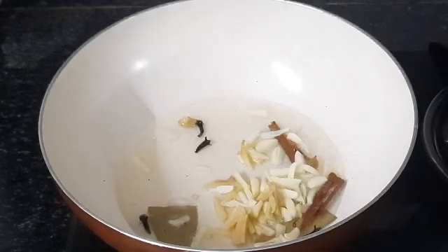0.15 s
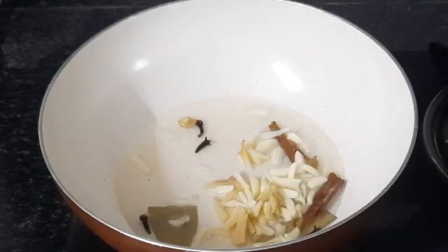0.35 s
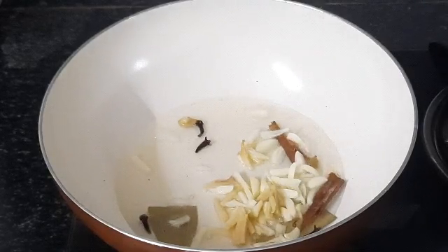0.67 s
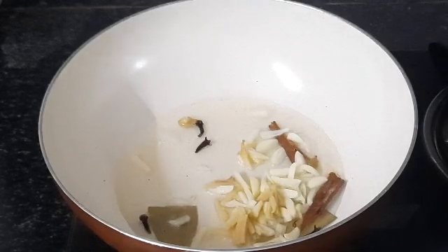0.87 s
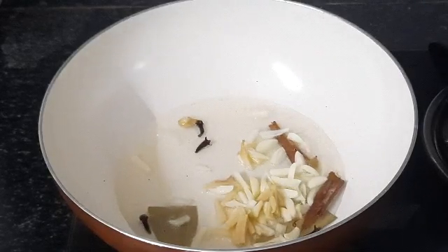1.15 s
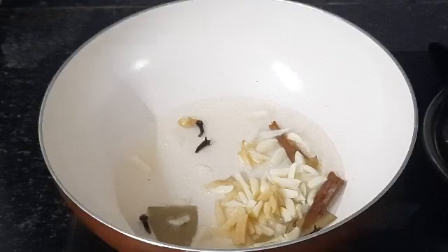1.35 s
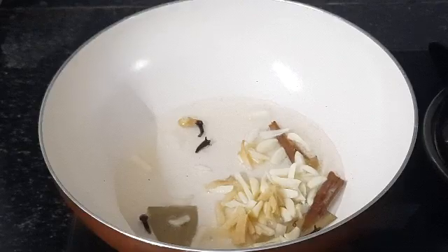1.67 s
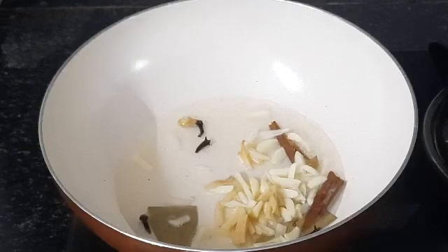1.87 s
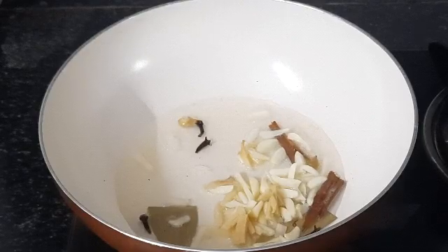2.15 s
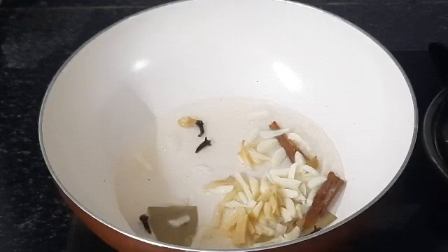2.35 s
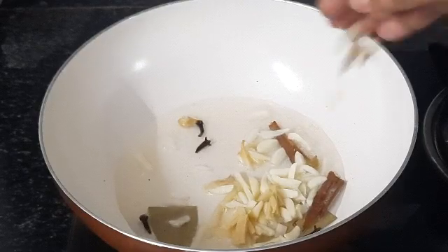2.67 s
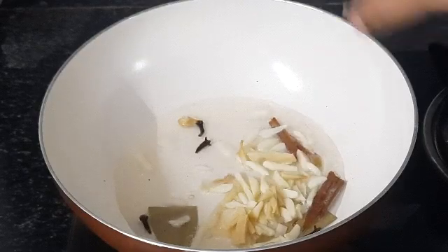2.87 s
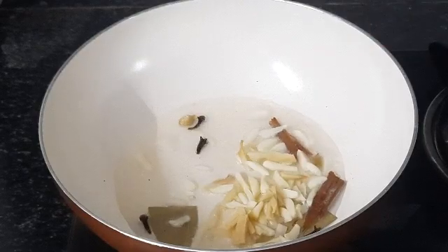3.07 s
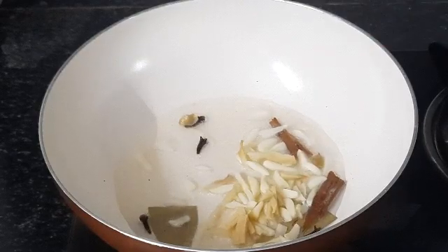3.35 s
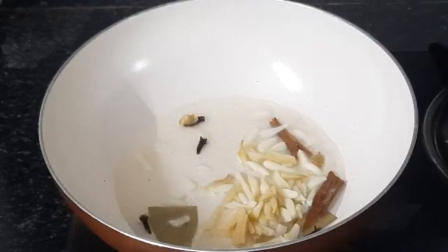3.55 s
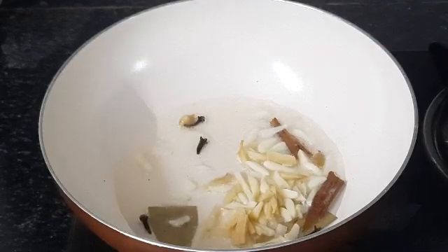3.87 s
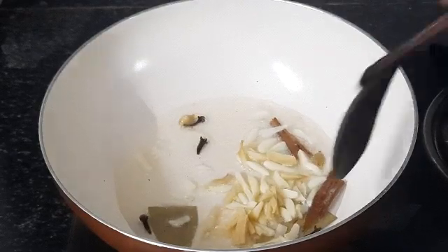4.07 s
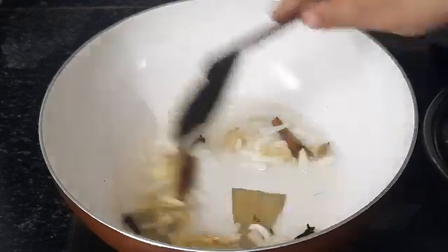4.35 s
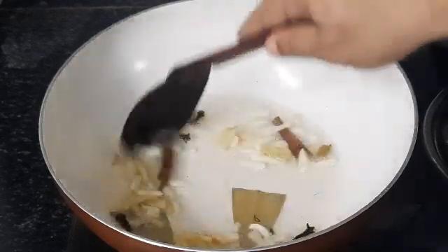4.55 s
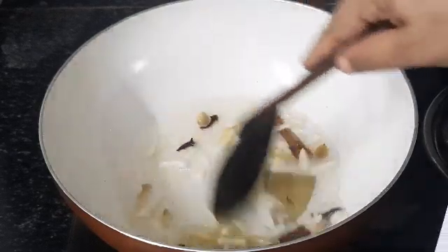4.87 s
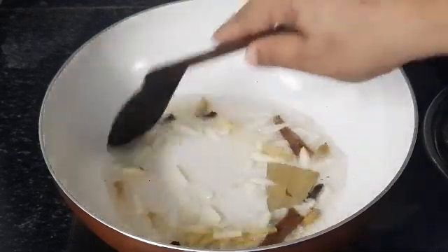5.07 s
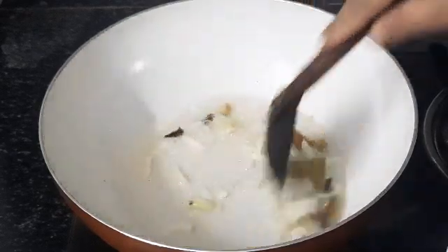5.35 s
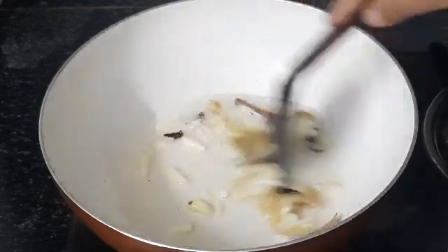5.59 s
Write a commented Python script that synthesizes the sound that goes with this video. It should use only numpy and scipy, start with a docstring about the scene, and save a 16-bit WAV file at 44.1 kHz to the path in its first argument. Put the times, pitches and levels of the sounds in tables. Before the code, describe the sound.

Steady bright sizzle of hot oil with sharp pops, scattered kitchen utensil knocks, then a spatula tapping and scraping the pan as the sizzle swells.

```python
"""Ginger, garlic and whole spices sizzle in hot oil in a wide pan, in a small kitchen, heard by two spaced microphones.
All along, tiny steam bubbles fizz as short tones in noise, larger ones pop, and filtered noise makes the room's hush.
First a spoon is knocked and rubs; at about 1 s everything dips very briefly. Then a dish, a small bowl and
the dish again are knocked on the counter, and last a spatula taps and scrapes the pan while the fizz grows.
Knocks are short pulses that ring a list of tones, rubbing is shaped noise, and dull bumps are fading low tones."""
import sys
import numpy as np
from scipy import signal
from scipy.fft import rfft, irfft
from scipy.io import wavfile
from scipy.ndimage import uniform_filter1d

SR = 44100
rng = np.random.default_rng(int(sys.argv[2]) if len(sys.argv) > 2 else 0)


def bounce(signal):
    """Save signal as a 16-bit WAV file at the path given by the first command-line argument."""
    frames = np.transpose(np.atleast_2d(signal))
    limited = np.clip(frames, -1, 1)
    pcm = np.round(limited * 32767).astype(np.int16)
    wavfile.write(sys.argv[1], SR, pcm)


def amplitude_ratio(level_db):
    """Convert a level in decibels to the matching linear amplitude (field) ratio."""
    exponent = np.asarray(level_db, float) / 20
    return 10 ** exponent


N = 252252  # length in samples

# the tones the pan can ring with: f/Hz, level struck in the middle/dB, time to fade by 60 dB if left free/s,
# gain when struck at the side/dB, gain when struck at the rim/dB
PAN_TONES = [(331, 22.5, 0.21, -6, -5), (370, 19, 0.098, 3.5, -1), (505, 12, 0.14, -9, 6),
             (716, 4.5, 0.56, -23, 3.5), (766, -14.5, 0.72, 21, 15), (768, -12, 0.33, 14, 20.5),
             (863, -13, 0.66, 8, -9), (1277, 6.5, 0.067, -18, -5), (1408, -17.5, 0.24, 26.5, 3),
             (1840, -6, 0.034, -25, 18), (1996, 10.5, 0.084, -23, -8), (1887, -6.5, 0.31, -2, -12),
             (2215, -18.5, 0.15, 26.5, -6), (2400, 2, 0.13, 2, -1), (2580, -17, 0.68, -10, 17.5),
             (2710, -22, 0.33, -2, 22), (2880, 0, 0.12, -1, -4.5), (5830, 12, 0.18, -5, -7),
             (6720, 17, 0.11, -4, -5.5)]


def evened(x):
    """Scales to rms 1."""
    return x / np.sqrt(np.mean(x ** 2) + 1e-20)


def read(points, hz):
    """Reads a table on a log frequency axis."""
    f, value = np.transpose(points)
    return np.interp(np.log(hz + 1), np.log(f + 1), value)


def coloured(x, points):
    """Filters by a dB spectrum."""
    gain = amplitude_ratio(read(points, np.fft.rfftfreq(x.shape[-1], 1 / SR)))
    return irfft(rfft(x) * gain, x.shape[-1])


def pulse(colour, size):
    """A single hard impulse of the given colour, peak 1."""
    click = 1. * (np.arange(size) == 50)
    x = coloured(click, colour) * signal.windows.tukey(size, .002)
    return x / abs(x).max()


def add(mix, s, sound, pan_db, lag):
    """Places a sound (one row, or one for each side); it reaches the left microphone lag samples after the right."""
    for ear, sign in enumerate((1, -1)):
        row = np.atleast_2d(sound)[-ear]
        start = max(round(s * SR + sign * lag / 2), 0)
        part = mix[ear, start:][:len(row)]
        part += amplitude_ratio(sign * pan_db / 2) * row[:len(part)]


def fizz():
    """Thousands of tiny bubbles burst, each a few cycles at its own pitch and place, over a blur of finer ones."""
    # how hard the oil boils: t/s, level/dB
    boil = [(0.0, -50.5), (1.31, -50.5), (1.7, -54), (3.43, -49), (4.14, -53), (4.51, -42), (5.72, -42)]
    # how bright the fizz is: f/Hz, level/dB
    fizz_colour = [(290, -19), (500, -20), (761, -12), (1060, -21.5), (1300, -8), (1550, -16.5), (2810, -7),
                   (9920, -7), (12700, -3.5), (14900, -9), (16000, -49)]
    bubbles_per_s, bubble_spread_db, pitches = 2900, 8.5, 24
    size_db = bubble_spread_db * np.minimum(rng.exponential(1, N), 5)
    size = amplitude_ratio(size_db) * (rng.random(N) < bubbles_per_s / SR)
    kind, t = rng.integers(0, pitches, N), np.arange(300) / SR
    bubbles = np.zeros((2, N))
    for k, hz in enumerate(np.geomspace(1500, 15000, pitches)):
        burst = np.sin(2 * np.pi * hz * t) * np.exp(-t * hz / 3.6) * np.sqrt(hz / SR) * hz / SR
        heard = signal.oaconvolve(size * (kind == k), burst)[:N]
        bubbles += [heard, np.roll(heard, rng.integers(-12, 13))]  # each pitch has its own place
    blur = amplitude_ratio(11.0) * rng.standard_normal((2, N))
    out = evened(coloured(evened(bubbles) + blur, fizz_colour))
    out = out * amplitude_ratio(np.interp(np.arange(N) / SR, *np.transpose(boil)))
    return amplitude_ratio(np.array([[1.2], [-1.2]])) * out  # a little stronger left


def pops():
    """A pocket of steam bursts: a sharp click around its pitch, a short tone, a low thump and a spray of droplets."""
    # loud steam pops: t/s, level/dB, bubble pitch f/Hz, low thump relative to the pop before a fixed boost/dB
    loud_pops = [(0.7536, -30.5, 12300, -11), (0.979, -18.5, 12300, -4.5), (1.0078, -34, 2830, 2.5),
                 (1.1214, -39, 2920, -20), (1.1898, -19.5, 11000, -6.5), (1.31, -22.5, 11500, -17),
                 (1.5507, -43, 3900, -5), (1.5734, -41, 2590, -29), (2.0138, -27.5, 11300, -9),
                 (2.2436, -41, 3250, 8), (2.4043, -23.5, 13000, -50), (2.5474, -37, 3800, -33),
                 (2.6544, -35, 2780, -38), (2.707, -34, 11200, -7), (2.7668, -26, 12500, -2.5),
                 (2.806, -35, 4300, -1), (2.9497, -32, 7160, -2.5), (3.168, -39, 4800, -15),
                 (3.245, -28, 12100, -28), (3.3501, -21, 12700, -12), (3.8993, -38, 7260, 3),
                 (3.9858, -35, 7000, -7.5), (4.1299, -29.5, 13500, 1), (4.181, -35.5, 5500, -35),
                 (4.3405, -34, 4150, 11.5), (4.5096, -29.5, 3070, -1), (4.5706, -28, 8600, -33),
                 (4.6017, -26, 5330, -14), (5.028, -43, 3500, 7), (5.1008, -28, 10600, -8),
                 (5.4906, -32, 4800, -28), (5.6412, -33, 5640, 5)]
    thump_colour = [(300, -22.5), (700, -6.0), (1500, -5.5), (3000, -6.0), (6000, -14.0)]  # f/Hz, level/dB
    out, t = np.zeros((2, N)), np.arange(4096) / SR
    # ten fainter pops come at random times, levels and pitches
    faint = [(a * N / SR, -47 + 10.0 * b, 2600 * 2 ** (2 * c), -20) for a, b, c in rng.random((10, 3))]
    for s, db, hz, low_db in list(loud_pops) + faint:
        spray_db = 0.5 - 2.5 * np.log2(hz / 3000)  # smaller, higher pockets throw fewer droplets
        grit, place = rng.standard_normal((2, len(t))), rng.uniform(-0.99, 1)
        colour = [(hz / 16, -40), (hz / 4, -12.0), (hz, 0), (hz * 3, -12.0)]
        click = 1.1 * pulse(colour, len(t))
        spray = amplitude_ratio(spray_db) * evened(coloured(grit, colour)) * np.exp(-t / 0.00088)
        tone = 0.36 * np.sin(2 * np.pi * hz * t) * np.exp(-t * hz / 9.2)
        thump = amplitude_ratio(low_db + 10.5) * pulse(thump_colour, len(t))
        pop = click + spray + np.roll(tone, shift=48) + thump
        add(out, s, amplitude_ratio(db) * pop, 3.8 + 0.47 * place, -6 * place)
    return out


def knocks(rows, modes, feel, pan_db, lag, ring_db, crack_db, rattle_db, split, grip_s):
    """Each blow is a hard pulse with a rattle (the contact); it rings the object's tones until a grip stills them.

    feel: bass dB at depth 0, bass dB per dB of depth, treble dB at hardness 0, treble dB per dB of hardness."""
    wobble_db = 3.5  # loose contacts make every ring waver
    contact, ringing, t = np.zeros((2, N)), np.zeros((2, N)), np.arange(48 * 256) / SR
    hz, mode_db, t60, *gains_db = (c[:, None] for c in np.transpose(modes))
    for s, db, mid, high, *spot in rows:
        # spot struck: 0 middle, 1 side, 2 rim; none for the spoon and the bowl
        spot_db = sum(gain * max(1 - abs(spot[0] - k - 1), 0) for k, gain in enumerate(gains_db))
        low, top = feel[0] + feel[1] * mid, feel[2] + feel[3] * high
        colour = [(150, low - 35), (310, low), (750, mid), (1600, 0), (2750, high), (4800, top), (12000, top - 12.0)]
        # each higher tone is split and beats
        beat, start = rng.standard_normal((2, len(hz), 1))
        twins = 1 + split * (hz > 600) * np.cos(2 * np.pi * (35 + 19.0 * beat) * t + .5 * start)
        waver = np.repeat(rng.standard_normal((len(hz), 24)), 512, axis=1)
        twins = twins * amplitude_ratio(wobble_db * uniform_filter1d(waver, size=512))
        # each higher tone radiates its own way to each microphone
        turn = 0.81 * (hz > 740) * rng.standard_normal((2, len(hz), 1))
        rise = np.square(1 - np.exp(-t * hz / 1.61))
        grip = np.square(t / (grip_s * (1 + 1.1 * sum(spot))))  # the grip stills the edges last
        fall = amplitude_ratio(-60 * t / t60 - grip)
        strength = amplitude_ratio(mode_db + spot_db + read(colour, hz))
        ring = strength * rise * twins * np.sin(2 * np.pi * hz * t + turn)
        # the touch damps the first swing fast
        swing = amplitude_ratio(ring_db) * 1.93 * np.exp(-t / 0.0029) * ring.sum(1)
        grit = coloured(rng.standard_normal((2, len(t))), colour)
        rattle_fall = np.exp(-t / 0.0056) + 0.61 * np.exp(-t / 0.0033)
        rattle = amplitude_ratio(rattle_db) * (grit + 0.75 * grit[0]) * rattle_fall
        crack = amplitude_ratio(crack_db) * pulse(colour, len(t))
        add(contact, s, amplitude_ratio(db) * (crack + rattle + swing), pan_db, lag)
        add(ringing, s, amplitude_ratio(db + ring_db) * (fall * ring).sum(1), pan_db, lag)
    # the knocks carry little below 230 Hz
    return signal.sosfilt(signal.butter(4, 230, "high", fs=SR, output="sos"), [contact, ringing])


def pan():
    """The spatula taps the pan; oil and spices still its ringing."""
    # taps: t/s, level/dB, depth (how far the blow reaches the low tones)/dB, hardness (the high ones)/dB, spot struck
    pan_taps = [(4.2746, -23.5, -5, -3.5, 0.15), (4.6253, -27, 1, -3.5, 1.1), (4.676, -39, 1, -3, 0.97),
                (4.8738, -39.5, -12, -2.5, 1.4), (5.1716, -51, 13, -1, 0.034),
                (5.5625, -20, -19.5, -2.5, 1.97), (5.5725, -49, -12, -4, 1.97)]
    return knocks(pan_taps, PAN_TONES, (-20.5, 0.53, 12, 9), pan_db=2.3, lag=-3.5, ring_db=-12.5,
                  crack_db=-4.0, rattle_db=3.7, split=0.76, grip_s=0.06)


def dish():
    """Blows on a dish ring its tones, which are soon stilled."""
    # blows: t/s, level/dB, depth/dB, hardness/dB, spot struck (0 middle, 1 side)
    dish_blows = [(1.2217, -27.5, 0.5, -25.5, 0.12), (1.2544, -39, 0, -42, 0.088),
                  (3.4558, -42, -3, -19.5, 0.2), (3.4645, -35.5, 6, -18, 0.13),
                  (3.505, -23, -0.5, -21, 0.14), (3.562, -51.5, 14, -14, 0.62),
                  (3.6541, -31.5, 1.5, -6.5, 1)]
    # tones: f/Hz, level struck in the middle/dB, free 60 dB fade/s, gain when struck at the side/dB
    dish_tones = [(303.5, 7, 0.27, -8), (428, 5, 0.083, 5), (699, -10, 0.053, 21), (774, 0.5, 0.18, -10),
                  (967, 4, 0.082, -20), (1211, -1.5, 0.2, 11), (1590, -1.5, 0.14, -12),
                  (1610, -8.5, 0.17, 13.5), (1776, -5, 0.037, 13), (1870, 10, 0.12, -8),
                  (2230, 5.5, 0.41, 1.5), (2250, 16, 0.17, -5.5), (2460, 13, 0.067, -7.5),
                  (2910, 20, 0.04, -7.5), (3225, 11.5, 0.06, -3), (3500, 7.5, 0.056, -2.5),
                  (4140, 0.5, 0.2, 0.5)]
    return knocks(dish_blows, dish_tones, (1.2, 2, -0.21, 0.63), pan_db=0.49, lag=9.4, ring_db=-7.5,
                  crack_db=-2.0, rattle_db=1.5, split=0.8, grip_s=0.013)


def spoon():
    """Blows on a spoon ring its tones, most of them very short."""
    # blows: t/s, level/dB, depth/dB, hardness/dB
    spoon_blows = [(0.0074, -32, -25, -11.5), (0.072, -43.5, -20, -23), (0.18, -37.5, -5.5, 2.1),
                   (0.2368, -24, -5, -7), (0.516, -42, -20, -6)]
    # tones: f/Hz, level/dB, free 60 dB fade/s
    spoon_tones = [(283, 28.5, 0.023), (768, -17, 0.15), (1170, 8.5, 0.017), (1235, 10, 0.027),
                   (1299, 4.7, 0.1), (1850, 2, 0.027), (2040, -0.5, 0.13), (2780, 2.5, 0.26),
                   (3530, -9, 0.044), (4510, -5, 0.07), (6140, 3, 0.022), (6840, 1, 0.044)]
    return knocks(spoon_blows, spoon_tones, (23.5, 7, 0, 1.7), pan_db=0.17, lag=9.1, ring_db=-12.5,
                  crack_db=-19.0, rattle_db=-1.0, split=1.0, grip_s=0.18)


def bowl():
    """One faint blow on a small bowl rings its few tones."""
    # blow: t/s, level/dB, depth/dB, hardness/dB
    bowl_blow = [(2.872, -57, 0.1, -8)]
    # tones: f/Hz, level/dB, free 60 dB fade/s
    bowl_tones = [(712, 14, 0.7), (1300, 1, 0.3), (2290, 6, 0.1)]
    return knocks(bowl_blow, bowl_tones, (1.2, 2, -0.21, 0.63), pan_db=2.2, lag=-2.5, ring_db=-8.0,
                  crack_db=-12.0, rattle_db=-6.0, split=0.4, grip_s=0.055)


def rubbing():
    """Gritty rubbing of a utensil, and rough noise dying away after taps: uneven noise in bands, part ringing the pan."""
    # swells of rough noise: loudest moment t/s, level/dB, rise/s, fall/s, band centre then f/Hz
    swells = [(.395, -40, 0.13, 0.063, 2960), (4.3, -38.5, 0.097, 0.39, 1850),
              (4.7, -40.5, 0.17, 0.4, 1300), (5.185, -43, 0.023, 0.58, 604),
              (5.331, -40.5, 0.056, 0.039, 420), (5.35, -36, 0.23, 0.14, 1300),
              (5.554, -32.5, 0.025, 0.04, 2130), (5.72, -39, 0.19, .1, 1880)]
    span_db, octaves_per_s = 32.5, 5.6  # fade over one rise or fall; climb of the band as the swell grows
    rough = rng.standard_normal((2, N)) * amplitude_ratio(2.7 * rng.exponential(1, N))
    t = np.arange(SR // 4) / SR
    body = sum(amplitude_ratio(0.53 * d - 60 * t / t60) * np.sin(2 * np.pi * f * t) for f, d, t60, *_ in PAN_TONES)
    ringing = signal.oaconvolve(rough, body[None], axes=1)[:, :N]
    drive = evened(rough) + 0.5 * evened(ringing)
    hz, at, z = signal.stft(drive, SR, nperseg=512)
    power = np.zeros(z.shape[1:])
    for s, db, rise, fall, centre_hz in swells:
        swell_db = -span_db * np.maximum((s - at) / rise, (at - s) / fall)
        centre = np.maximum(centre_hz * 2 ** (octaves_per_s * np.clip(at - s, -rise, 0)), 340)
        band = np.exp(-(np.log2((hz[:, None] + 1) / centre) / 0.5) ** 2)
        power += band / (band.mean(0) * 3.75) * amplitude_ratio(db + swell_db) ** 2
    return signal.istft(z * np.sqrt(power), SR, nperseg=512)[1][:, :N]


def kitchen(x):
    """Diffuse echo of the room, other taps for each microphone; long bass waves reach both alike."""
    # how long the echo lasts: f/Hz, time to fade by 60 dB/s
    echo_time = [(150, 0.42), (400, 0.44), (1000, 0.42), (2500, 0.31), (6000, 0.48), (14000, 0.085)]
    taps = np.zeros((2, SR // 2))
    at = np.arange(100, SR // 2 - 20, 20) + rng.integers(0, 20, (2, (SR // 2 - 101) // 20))
    np.put_along_axis(taps, at, rng.choice([-1., 1.], at.shape), 1)
    hz, t, z = signal.stft(taps, SR, nperseg=256)
    alike = np.exp(-(hz[:, None] / 550) ** 2)
    z[1] = alike * z[0] + np.sqrt(1 - alike ** 2) * z[1]
    fade = amplitude_ratio(-60 * t / read(echo_time, hz)[:, None])
    tail = signal.istft(z * fade, SR, nperseg=256)[1]
    return signal.oaconvolve(x, tail / np.linalg.norm(tail[0]), axes=1)[:, :N]


def room_noise():
    """Background room noise, from deep rumble up to about 3 kHz, partly shared by the microphones and stronger left."""
    # how the noise wavers: t/s, level/dB
    air_level = [(0.0, -62.5), (1.3, -66.5), (2.7, -68), (3.5, -61.5), (5.21, -62), (5.72, -50)]
    # colour of the noise: f/Hz, level/dB
    air_colour = [(12, -42), (20, -20), (66, 3.5), (208, -8), (312, -2.5), (507, -9), (759, -5.5),
                  (1070, -42), (1260, -8), (2500, -3.5), (3250, -55), (5500, -120)]
    # how alike left and right are: f/Hz, likeness (1 the same, 0 unrelated)
    likeness = [(60, 0.55), (240, 0.27), (950, 0.66), (3770, 0.64), (15000, 0.03)]
    hz = np.fft.rfftfreq(N, 1 / SR)
    left, other = rfft(rng.standard_normal((2, N)))
    same = np.clip(read(likeness, hz), -1, 1)
    right = same * left + np.sqrt(1 - same ** 2) * other
    out = evened(irfft(amplitude_ratio(read(air_colour, hz)) * [left, right], N))
    return out * amplitude_ratio(np.interp(np.arange(N) / SR, *np.transpose(air_level)) + np.array([[1.6], [-1.6]]))


def bumps():
    """Dull low bumps, as of the recorder being nudged: each is one fading low tone."""
    # bumps: t/s, level/dB, f/Hz, time to fade by 60 dB/s
    nudges = [(1.312, -14.5, 68, 0.0064), (3.503, -29.5, 121, 0.021), (4.052, -52, 80.5, 0.19),
              (5.569, -46.5, 104, 0.091)]
    out, t = np.zeros((2, N)), np.arange(SR // 3) / SR
    for s, db, bump_hz, t60 in nudges:
        bump = amplitude_ratio(db - 60 * t / t60) * np.sin(2 * np.pi * bump_hz * t) * (1 - np.exp(-t / 0.0015))
        add(out, s, bump, 4.0, 0)
    return out


def scene():
    """Sharp sounds fill the room most; the ringing is heard mostly direct."""
    near = pops()
    contact, ringing = spoon() + dish() + pan() + bowl()
    rubbed = rubbing()
    echo = kitchen(amplitude_ratio(0.5) * near + amplitude_ratio(-2.0) * contact + amplitude_ratio(-12.5) * ringing + amplitude_ratio(-12.0) * rubbed)
    return near + contact + ringing + rubbed + echo + fizz() + room_noise() + bumps()


def top_cut(x):
    """Nothing passes above the cut-off."""
    return signal.sosfilt(signal.butter(12, 16810, fs=SR, output="sos"), x)


def record(dry):
    """The microphone cuts deep bass, and the sound dips briefly."""
    # the dip: from t/s, to t/s, level/dB
    dip = (.969, .9765, -25)
    mix = signal.lfilter(*signal.butter(2, 40, "high", fs=SR), dry)
    t = np.arange(N) / SR
    dip_db = uniform_filter1d(dip[2] * ((t > dip[0]) & (t < dip[1])), size=100)  # soft edges
    mix = mix * amplitude_ratio(dip_db)
    return top_cut(mix)


dry = scene()
out = record(dry)
bounce(out)
```